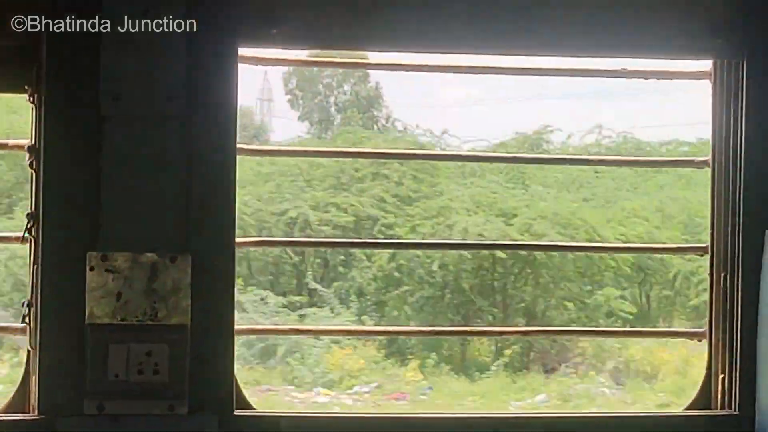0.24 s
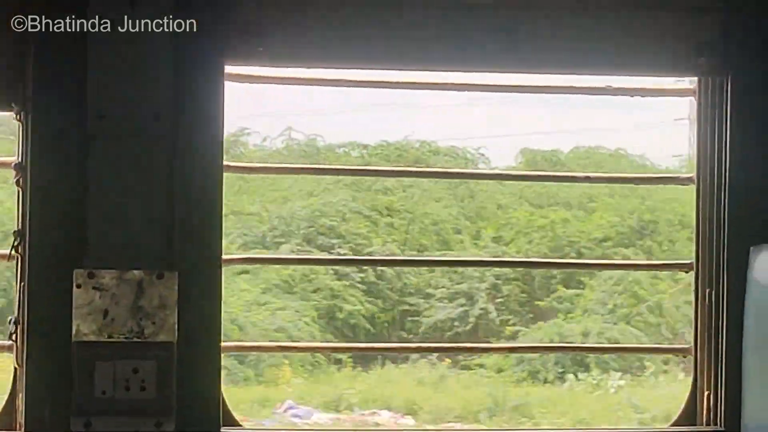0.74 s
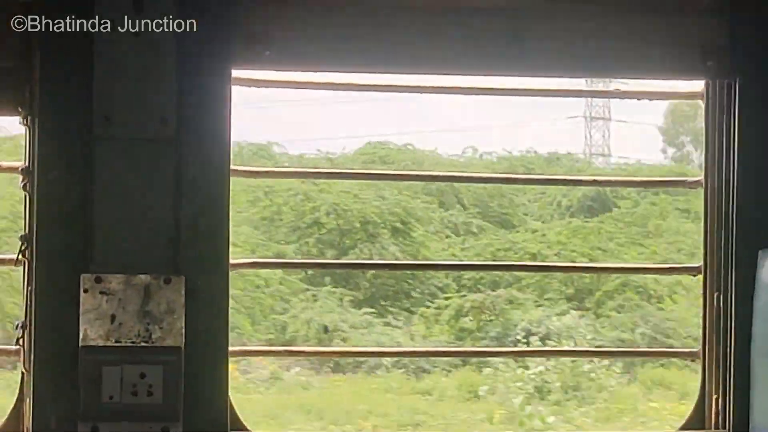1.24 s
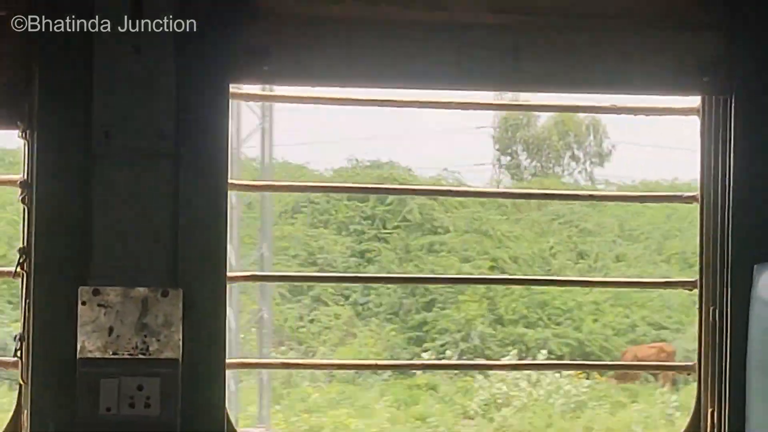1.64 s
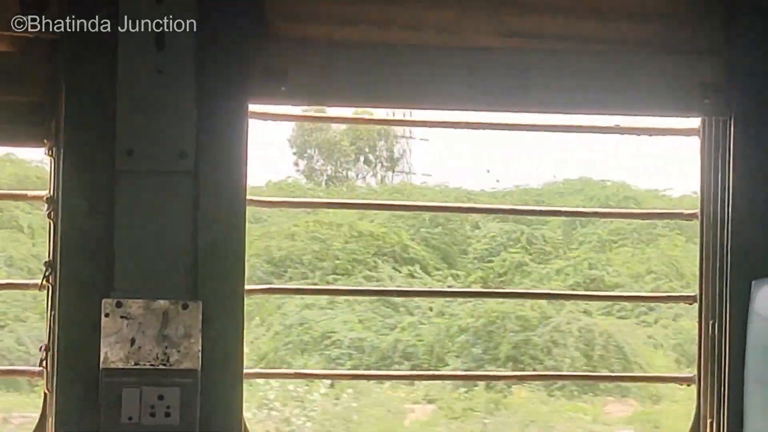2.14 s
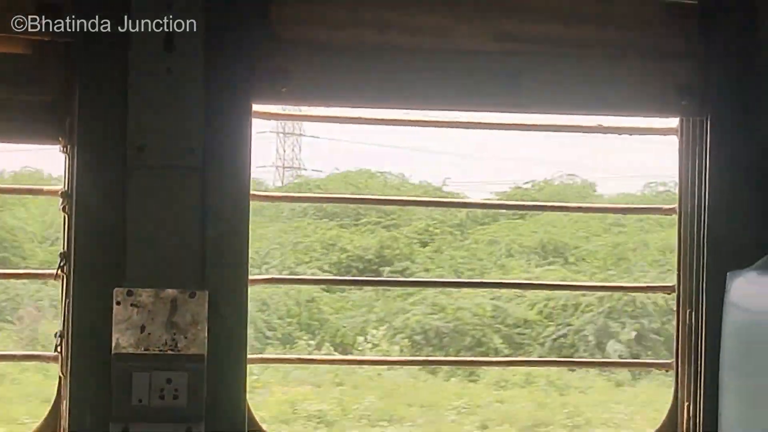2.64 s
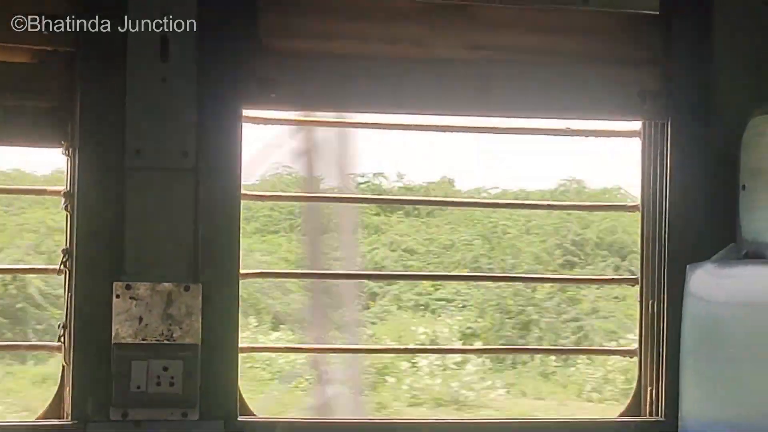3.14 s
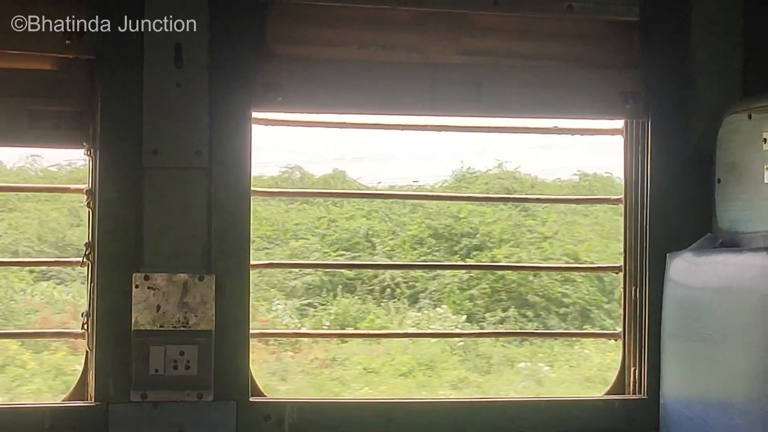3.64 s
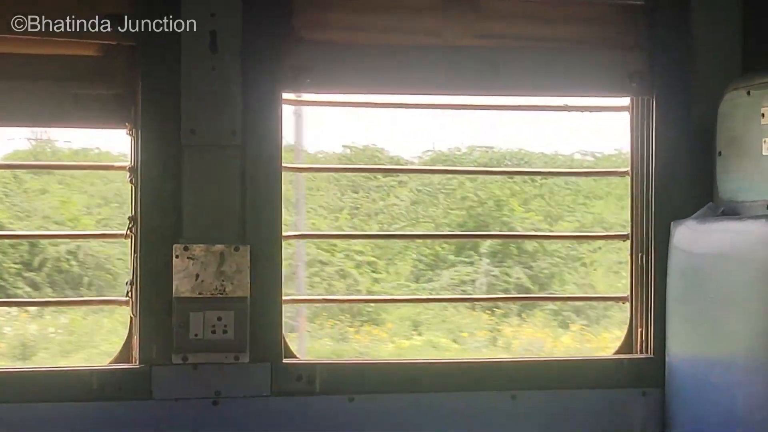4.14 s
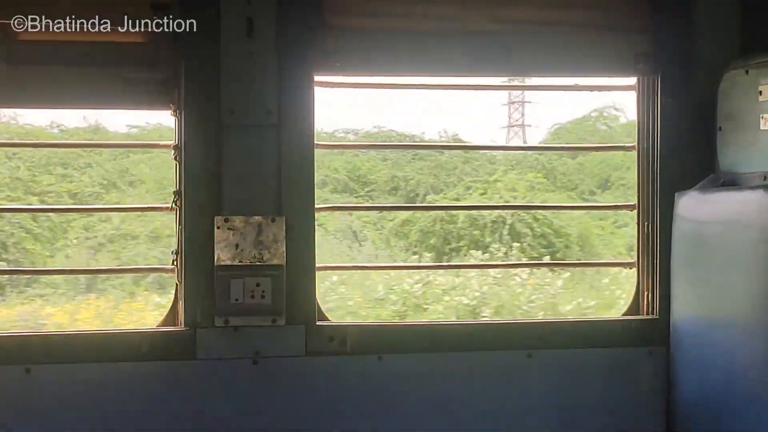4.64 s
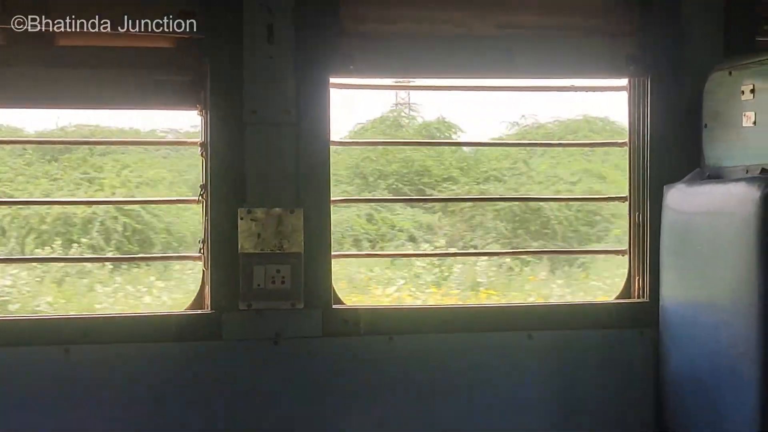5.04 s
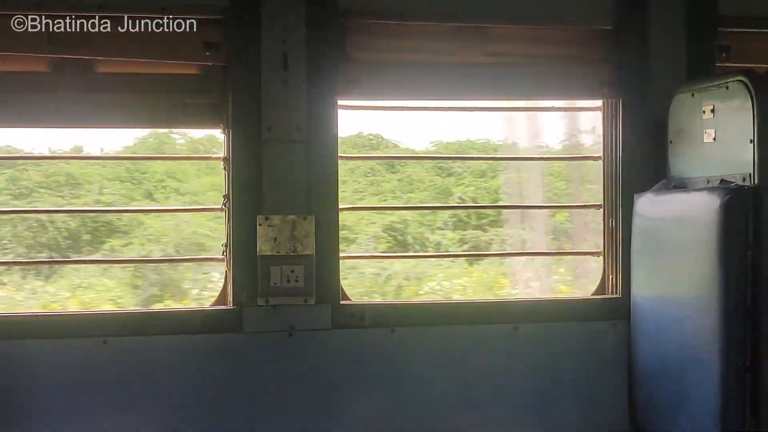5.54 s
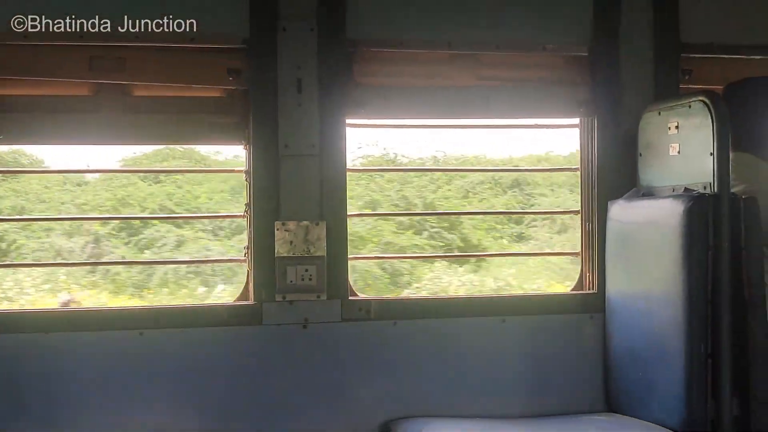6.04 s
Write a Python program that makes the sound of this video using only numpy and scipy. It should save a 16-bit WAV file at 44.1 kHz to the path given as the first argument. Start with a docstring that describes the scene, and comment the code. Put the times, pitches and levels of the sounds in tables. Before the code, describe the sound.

Inside a fast railway coach with open barred windows, wheels roar and rasp over joints while loose panels clatter and wind hisses mostly on the right.

```python
"""Inside a passenger coach running at speed with its windows open: the body booms in shaped low noise and drones in low tones.
Shaped noise gives the wheels' roar, rasp, chuff and rough ring; decaying sines give thuds, clanks and pings.
Random taps on decaying sines make loose parts rattle and clatter; bright noise hisses past the barred window, mostly on the right.
A limiter holds the peaks down, and now and then the level dips briefly."""
import sys
import numpy as np
from scipy import signal
from scipy.fft import rfft, irfft, next_fast_len
from scipy.io import wavfile
from scipy.ndimage import uniform_filter1d, minimum_filter1d

SR = 44100
rng = np.random.default_rng(int(sys.argv[2]) if len(sys.argv) > 2 else 0)


def to_wav(sig):
    """Store sig (one row per channel, or 1-D mono) as 16-bit WAV at the path in sys.argv[1].

    Samples outside -1..1 are clipped; the rate is SR.
    """
    pcm = np.clip(np.atleast_2d(sig), -1, 1) * 32767
    pcm = np.round(pcm).astype(np.int16)
    wavfile.write(sys.argv[1], SR, pcm.T)  # frames by channels


N = 277389  # length in samples

# Wheels rolling on the rail, before each layer's own offset: time_s, level_db
ROAR = [(0, -31), (0.14, -30.5), (0.22, -26), (0.6, -28.5), (0.9, -28), (1.15, -29.5), (1.75, -26),
        (2.25, -28.5), (2.45, -28.5), (3.5, -28.5), (3.7, -26), (4.45, -29.5), (4.8, -26.5), (5.8, -25.5),
        (6.0, -27.5), (6.29, -27.5)]
# Tone colour of the roar: frequency_hz, level_db (per hertz)
ROAR_COLOUR = [(150, -43), (300, -1), (400, -1.5), (580, 1), (690, -1.5), (830, 0), (1050, 0), (1400, -6),
               (1800, -8.5), (2300, -14), (2900, -17), (4500, -23.5), (8000, -55), (10000, -70)]
# Resonances of wheels and rail: pitch_hz, width_hz, height_db
WHEEL_MODES = [(470.5, 3.7, 4.5), (489.5, 16, 5), (782.6, 120, 0.5), (878, 16, 2.5), (1084, 22, 0)]
# Balance of the wheels and coach body: frequency_hz, left_minus_right_db
WHEEL_SIDE = [(30, -1.5), (200, -0.5), (380, -1.5), (520, .5), (1300, 0.5), (1800, 3.5), (2300, 2.5),
              (3000, 0)]
# Axles drop at joints or dents, often in pairs, before offset and scatter:
# time_s, level_db, hardness (dB per octave)
THUDS = [(0.018, -6, -7), (0.043, -13.5, 0.5), (.19, -18.5, 4), (0.648, -11, 0.5), (0.69, -22, -1),
         (0.874, -13.5, 0.5), (0.995, -18, 6.5), (1.247, -12, -5), (1.354, -7.5, 2), (1.682, -13.5, -6),
         (1.79, -10.5, 3.5), (2.16, -11, 1), (2.249, -16, 1), (2.291, -10.5, -4), (2.405, -14.5, 1),
         (2.603, -9, 1.5), (2.691, -16, 0), (2.72, -14.5, 6), (3.093, -14, -5), (3.19, -17.5, -16),
         (3.223, -8, -4.5), (3.27, -15.5, -6), (3.352, -10, -0.5), (3.566, -9.5, -7), (3.675, -10, 3),
         (4.033, -6, -8.5), (4.066, -14, 2), (4.145, -5.5, -2.5), (4.955, -12, 1), (5.064, -13, -2.5),
         (5.479, -14.5, -1), (6.147, -12, -10)]
LEFT_RIGHT = np.array([[1], [-1]])


def from_db(db):
    """Turn decibels into gain."""
    return 10 ** (np.asarray(db) / 20)


def rms_one(x):
    """Scale to unit power."""
    return x / np.sqrt(np.mean(x ** 2) + 1e-20)


def in_time(rows):
    """Join the points of each column with straight lines, sample by sample."""
    times, *columns = np.transpose(rows)
    return [np.interp(np.arange(N) / SR, times, column) for column in columns]


def at_hz(points, hz):
    """Read a spectrum on a log-frequency axis."""
    point_hz, point_db = np.array(points)[:, 0], np.array(points)[:, 1]
    return np.interp(np.log(hz + 1e-9), np.log(point_hz), point_db)


def swell(at, rise_s, fall_s):
    """A straight rise to 1 at the given time, and a straight fall back to 0."""
    return np.interp(np.arange(N) / SR, [at - rise_s, at, at + fall_s], [0, 1, 0])


def drift(rate):
    """Slow random wander with spread 1: noise smoothed by two equal poles at the given rate in Hz."""
    step = 40  # one slow value per 40 samples
    warm_up = 2000
    r = np.exp(-2 * np.pi * rate * step / SR)
    noise = rng.standard_normal(N // step + warm_up + 2)
    slow = signal.lfilter([1], [1, -2 * r, r * r], noise)[warm_up:]
    return np.interp(np.arange(N) / step, np.arange(len(slow)), rms_one(slow))


def ring(clicks, hz, t60):
    """A unit click starts a sine of height 1 that loses 60 dB in t60 seconds."""
    r = np.exp(-np.log(1000) / (t60 * SR))
    w = 2 * np.pi * hz / SR
    return signal.lfilter([0, np.sin(w)], [1, -2 * r * np.cos(w), r * r], clicks + 1e-18)


def cabin_noise(colour, balance, modes=()):
    """Random forcing, coloured and lifted at its resonances, heard in two channels; rms 1."""
    # How alike left and right are: frequency_hz, correlation
    likeness = [(60, 0.98), (160, 0.98), (260, 0.8), (390, 0.53), (480, 0.77), (640, 0.34), (860, 0.56),
                (1000, 0.11), (1600, -0.3), (2100, -0.1), (2600, 0.21), (3500, -0.2), (4800, 0.1),
                (8000, -0.0091)]
    size = next_fast_len(N)
    hz = np.arange(size // 2 + 1) * SR / size
    peaks_db = sum(db / (1 + (2 * (hz - f) / width) ** 2) for f, width, db in modes)
    level_db = at_hz(colour, hz) + peaks_db
    alike = np.clip(at_hz(likeness, hz), -1, 1)
    mid, side = rfft(rng.standard_normal((2, size)))
    pair = np.sqrt(1 + alike) * mid + np.sqrt(1 - alike) * side * LEFT_RIGHT
    side_db = LEFT_RIGHT * at_hz(balance, hz) / 2
    return rms_one(irfft(pair * from_db(level_db + side_db), size)[:, :N])


def steady(x, seconds):
    """Even out swells slower than the given time."""
    power = uniform_filter1d(np.mean(x ** 2, axis=0), max(int(seconds * SR), 2))
    return x / np.sqrt(power + 1e-9)


def dips():
    """Gain of the whole sound, which falls quickly at each dip and recovers more slowly."""
    # Brief dips: time_s, depth_db
    dip_rows = [(0.029, 3), (0.535, 5.5), (1.83, 2), (2.73, 1.5), (3.25, 1), (3.825, 3)]
    return from_db(-sum(db * swell(s, rise_s=0.012, fall_s=0.12) for s, db in dip_rows))


def lulls():
    """Gain of the bass, which mostly drops away for a moment between surges."""
    # Lulls (a negative depth is a rise): time_s, depth_db
    lull_rows = [(.24, 5), (.45, 1), (.67, 3), (.99, 11), (1.15, 6), (1.58, 6), (2.07, 4), (3.28, -2),
                 (3.5, 8), (4.18, 7), (4.6, 3), (5.66, 5)]
    return from_db(-sum(db * swell(s, rise_s=0.04, fall_s=0.04) for s, db in lull_rows))


def window(level_db=1.0, fine_db=0.96, whistle_db=-18, waver_db=4, flutter_db=1.0, split_hz=6000):
    """Turbulent air along the window bars flutters, larger and finer eddies apart; a thin whistle flares."""
    # Air rushing past, before offsets: time_s, level_db
    air_rows = [(0, -36.5), (0.12, -39), (0.33, -35), (0.58, -39), (0.84, -36), (0.95, -39.5),
                (1.08, -37.5), (1.24, -36), (1.68, -35), (1.78, -32.5), (1.9, -35.5), (2.15, -35.5),
                (2.32, -37.5), (2.46, -36), (2.74, -39.5), (2.84, -36.5), (3.02, -35.5), (3.35, -38.5),
                (3.6, -36), (3.76, -36), (4.12, -38), (4.31, -36.5), (4.55, -38.5), (4.95, -34), (5.2, -35),
                (5.7, -35), (5.8, -32.5), (6.0, -37), (6.29, -35)]
    # Tone colour of the hiss: frequency_hz, level_db (per hertz)
    hiss_colour = [(1200, -7), (2300, -3.5), (3000, -3), (3700, 2.5), (4500, 0.5), (6400, 0.5), (7300, 3),
                   (8000, -5), (8800, -19), (9600, -24.5), (11500, -20.5), (13000, -17.5), (13700, -22),
                   (14300, -29)]
    # Whistle of the air on the bars: frequency_hz, level_db (per hertz)
    whistle_colour = [(6000, -48), (6900, 7), (7100, -31), (7280, 16), (7500, -23), (8400, -50),
                      (12500, -45), (12950, -17), (13400, -45)]
    # Balance of the window: frequency_hz, left_minus_right_db
    window_side = [(2500, -14.5), (3700, -5.5), (5000, -9.5), (6600, -10), (7400, -6), (8300, 2.5),
                   (9600, -23), (10800, -11), (12200, -3.5), (14000, -2)]
    # The whistle flares: time_s, rise_db
    whistle_rows = [(1.215, 12), (1.44, 13), (3.46, 13)]
    # Gusts brighten the hiss: time_s, rise_db, length_s
    gust_rows = [(1.35, 0.5, .4), (1.98, 2, .1), (2.124, 2, 0.1), (5.79, 1, 0.14)]

    hiss_db, = in_time(air_rows)
    flare_db = sum(db * swell(s, rise_s=0.053, fall_s=0.13) for s, db in whistle_rows)
    gust_db = sum(db * swell(s, length / 2, length / 2) for s, db, length in gust_rows)

    air = cabin_noise(hiss_colour, window_side)
    larger = signal.sosfiltfilt(signal.butter(4, split_hz, fs=SR, output="sos"), air)
    finer = air - larger
    larger_gain = from_db(hiss_db + level_db + flutter_db * drift(rate=18))
    finer_gain = from_db(hiss_db + fine_db + gust_db + flutter_db * drift(rate=18))

    waver = waver_db * np.tanh(drift(rate=36))
    whistle_gain = from_db(hiss_db + whistle_db + flare_db + waver)
    whistle = whistle_gain * cabin_noise(whistle_colour, window_side)
    return larger_gain * larger + finer_gain * finer + whistle


def loose_parts(taps_per_s, t60, range_hz, count=10):
    """Random taps set loose parts ringing, each with its own pitch and place; rms 1."""
    out = np.zeros((2, N))
    for hz in np.geomspace(*range_hz, count):
        hits = rng.random(N) < taps_per_s / count / SR
        taps = hits * rng.uniform(.4, 1, N) * rng.choice([-1, 1], N)
        # higher rings spread further between the channels
        angle = np.pi / 4 + rng.uniform(-1.7, 1) * hz / 900
        place = np.array([[np.cos(angle)], [np.sin(angle)]])
        out += place * ring(taps, hz, t60)
    return rms_one(out)


def rattle(per_s=50, level_db=-39, t60=0.089, range_hz=(300, 1200)):
    """Loose shutters and fittings chatter at random, louder when the wheels roar louder."""
    roar_db, = in_time(ROAR)
    gain = from_db(level_db + roar_db - roar_db.mean())
    return gain * loose_parts(per_s, t60, range_hz, count=20)


def clatter(per_s=600, level_db=2, t60=0.055, rise_s=0.0071, fall_s=0.028, ring_on_s=0.063):
    """A jolt shakes heavy panels and light parts at once: a quick flurry of taps that rings on briefly."""
    # Clatters, before the offset: time_s, panels_db, light_parts_db
    clatter_rows = [(0.186, -48, -31.5), (0.236, -41, -37), (.885, -30, -30), (1.284, -30, -36),
                    (1.89, -44, -31), (2.133, -30, -39), (2.199, -29, -32), (2.277, -31, -40),
                    (2.783, -30, -37), (3.661, -32, -41), (3.769, -45, -32), (3.87, -37, -32),
                    (5.289, -32, -43), (5.351, -39, -40), (5.508, -33, -32), (5.771, -38, -28),
                    (5.846, -36, -30)]
    panels_hz, light_parts_hz = (402, 634), (740, 1109)
    times, *group_dbs = np.transpose(clatter_rows)
    flurry = sum(swell(s, rise_s, fall_s) for s in times)
    out = 0
    for dbs, range_hz in zip(group_dbs, (panels_hz, light_parts_hz)):
        strength = sum(from_db(db) * swell(s, rise_s, ring_on_s) for s, db in zip(times, dbs))
        taps = loose_parts(per_s * flurry, t60, range_hz)
        out = out + strength * steady(taps, seconds=0.017)
    return from_db(level_db) * out


def pings(per_s=6, level_db=-40, t60=0.2):
    """Pits in the rail tap the wheels, whose modes ring out in short metallic fragments."""
    out = 0
    for hz, _, db in WHEEL_MODES:
        taps = (rng.random(N) < per_s / SR) * rng.uniform(.3, 1, (2, N))
        out = out + from_db(db) * ring(taps, hz, t60)
    return from_db(level_db) * rms_one(out)


def wheel_flat(level_db=-40.0, turns_per_s=10.08, first_s=0.0063, rise_s=0.023, fall_s=0.037,
               scatter_db=2, band_hz=(660, 980)):
    """A worn patch on one wheel chuffs once every turn: a band of noise swells and fades."""
    times = first_s + np.arange(N / SR * turns_per_s) / turns_per_s
    beats = sum(from_db(scatter_db * rng.normal()) * swell(s, rise_s, fall_s) for s in times)
    noise = cabin_noise(ROAR_COLOUR, WHEEL_SIDE, WHEEL_MODES)
    scuff = signal.sosfilt(signal.butter(2, band_hz, "band", fs=SR, output="sos"), noise)
    return from_db(level_db) * rms_one(beats * scuff)


def flanges(base_db=-38.5, roar_share=0.22, flutter_db=1.5, hoarse_share=0.76, sing_db=-45.5, width_hz=52):
    """The wheels rasp along with the roar; flanges leaning on the rail add rasp and, more so, a rough ring."""
    # Tone colour of the rasp: frequency_hz, level_db (per hertz)
    flange_colour = [(900, -21), (1450, -35), (1700, -9), (1900, -5), (2090, -4), (2350, -7), (2700, -10),
                     (3300, -25), (6000, -60)]
    # Wheel resonances in this band: pitch_hz, width_hz, height_db
    flange_modes = [(2080, 90, 3), (2270, 50, 3)]
    # Flanges lean on the rail, before each layer's share: time_s, rise_db, length_s, pitch_hz
    rub_rows = [(0.216, 2.5, .1, 2060), (1.324, 3, 0.15, 2051), (1.716, 8, 0.099, 2094),
                (1.805, 7.5, .09, 2085), (2.079, 2.5, .14, 2055), (2.509, 6.5, .13, 2122),
                (2.882, 4, .1, 2040), (3.029, 2, .16, 2164), (3.61, 4, 0.084, 2142),
                (3.688, 6, 0.096, 2056), (3.93, 5, .1, 2060), (4.613, 4.5, 0.078, 2104),
                (5.56, 5.5, 0.25, 2110), (5.816, 7, 0.2, 2153), (5.947, 3, .08, 2043),
                (6.204, 5, .11, 2053)]

    roar_db, = in_time(ROAR)
    rub_db = sum(db * swell(s, length / 2, length / 2) for s, db, length, _ in rub_rows)
    level_db = base_db + roar_share * (roar_db - roar_db.mean()) + hoarse_share * rub_db
    noise = cabin_noise(flange_colour, WHEEL_SIDE, flange_modes)
    rasp = from_db(level_db + flutter_db * drift(rate=19)) * noise

    # the ring is slow noise carried up to a pitch that glides from rub to rub
    hz, = in_time([(s, pitch) for s, _, _, pitch in rub_rows])
    turn = np.exp(2j * np.pi * np.cumsum(hz) / SR)
    sing = np.array([np.real((drift(width_hz) + 1j * drift(width_hz)) * turn) for _ in range(2)])
    sides = from_db(LEFT_RIGHT * at_hz(WHEEL_SIDE, hz.mean()) / 2)
    return rasp + from_db(sing_db + 1.56 * rub_db) * sides * steady(sing, seconds=0.066)


def knocks(t60=0.19, contact_s=0.0053):
    """Hard hits set a wheel clanking at a single pitch; a fast-fading ring is taken away to soften the start."""
    # Clanks, before softening: time_s, level_db, pitch_hz
    knock_rows = [(.17, -26, 993), (.785, -20.5, 894), (.885, -26, 512), (2.125, -20, 479),
                  (2.27, -17, 487), (2.785, -22, 880), (3.095, -20.5, 464), (3.365, -27, 466),
                  (3.77, -24, 968), (3.865, -21, 878), (4.14, -17, 476), (4.635, -20, 475),
                  (4.955, -22, 872), (5.835, -22, 890)]
    out = 0
    for s, db, hz in knock_rows:
        blow = np.zeros(N)
        blow[int(s * SR)] = from_db(db)
        out = out + ring(blow, hz, t60) - ring(blow, hz, contact_s * np.log(1000))
    return out


def rolling(jolt_db=4.0, jolt_rise_s=0.012, jolt_fall_s=0.072):
    """Rough rail makes wheels roar and drums on the floor; both judder together, and the roar leaps at joints."""
    # Rail roughness felt through the floor, before offsets: time_s, level_db
    drum_rows = [(0, -32), (1.0, -31), (1.25, -34), (2.4, -32.5), (2.95, -32.5), (3.25, -31), (3.45, -39.5),
                 (3.6, -34.5), (4.85, -33.5), (5.15, -36.5), (6.29, -34.5)]
    # Tone colour of the drumming: frequency_hz, level_db (per hertz)
    drum_colour = [(70, -10.5), (115, -1.5), (150, -2.5), (180, -6), (208, -10.5), (260, -8), (320, -19),
                   (450, -18), (1200, -79)]

    drum_db, = in_time(drum_rows)
    roar_db, = in_time(ROAR)
    judder = drift(rate=10)
    rough_db = roar_db - roar_db.mean()
    leap_db = jolt_db * sum(from_db(db) * swell(s, jolt_rise_s, jolt_fall_s) for s, db, _ in THUDS)

    drum_gain = from_db(drum_db + 6.0 + 0.61 * rough_db + 1.25 * judder)
    drum = drum_gain * steady(cabin_noise(drum_colour, WHEEL_SIDE), seconds=0.071)
    roar_gain = from_db(roar_db - 1.5 + leap_db + 1.1 * judder)
    roar = roar_gain * steady(cabin_noise(ROAR_COLOUR, WHEEL_SIDE, WHEEL_MODES), seconds=0.087)
    return drum + roar


def drones(waver_hz=1.05, waver_db=3.5):
    """The ride catches low body resonances: nearly pure tones build up and die away, wavering."""
    # Drones, before wavering: middle_s, pitch_hz, level_db (rms at the peak), length_s
    drone_rows = [(0.83, 55.04, -20.5, 0.44), (1.65, 56.45, -23.5, 0.38), (1.834, 68.4, -12.5, 0.059),
                  (1.92, 48.7, -25.5, 1), (2.494, 52.6, -23.5, 0.43), (3.43, 52, -27, 0.1),
                  (3.98, 57, -25, 0.18), (4.99, 48.5, -22.5, 0.59), (5.289, 57, -22.5, 0.3),
                  (6.025, 56.85, -21.5, 0.37)]
    wander = waver_hz * drift(rate=2.9)
    out = 0
    for (s, hz, db, length), turn in zip(drone_rows, rng.random(len(drone_rows))):
        phase = 2 * np.pi * (turn + np.cumsum(hz + wander) / SR)
        strength = from_db(db) * np.sin(np.pi / 2 * swell(s, length / 2, length / 2))
        out = out + strength * np.sqrt(2) * np.sin(phase)
    return out * from_db(waver_db * drift(rate=8.6))


def body(level_db=2.23, surge_db=0.4):
    """The coach sways and booms in its lowest modes, in uneven surges, with brief rises and sinks."""
    # Body rumble, before offsets: time_s, level_db
    rumble_rows = [(0, -24.5), (0.35, -21.5), (0.58, -23), (0.82, -23.5), (1.0, -18.5), (1.2, -21),
                   (1.55, -23.5), (1.8, -23.5), (1.95, -28), (2.15, -21.5), (2.55, -20.5), (2.8, -22.5),
                   (3.2, -23), (3.75, -21.5), (4.15, -24.5), (4.35, -22.5), (4.65, -22), (4.95, -22.5),
                   (5.3, -20), (5.55, -21.5), (6.29, -20.5)]
    # Tone colour of the rumble: frequency_hz, level_db (per hertz)
    rumble_colour = [(5, -2), (14, -2), (30, 1), (40, -8), (65, -4.5), (100, -9.5), (130, -21), (250, -38),
                     (600, -74)]
    # Resonances of the coach body: pitch_hz, width_hz, height_db
    body_modes = [(29, 6.8, 1.5), (48.6, 1.8, 12.5), (56.3, 4.3, 10), (70.9, 15, 7.5), (90.5, 4.9, 5),
                  (104.2, 5.7, 9.5)]
    # Brief changes of the rumble's level (a negative rise is a sink): time_s, rise_db
    change_rows = [(.09, 5.5), (.315, 3.5), (.38, 2), (1.825, 4), (2.01, 5), (2.14, -1), (2.28, 2),
                   (2.57, -1), (3.385, 0.5), (3.58, 2), (3.99, 9), (4.351, 4), (5.91, 0)]

    rumble_db, = in_time(rumble_rows)
    change_db = sum(db * swell(s, rise_s=0.021, fall_s=0.053) for s, db in change_rows)
    boom = steady(cabin_noise(rumble_colour, WHEEL_SIDE, body_modes), seconds=0.0787)
    return from_db(rumble_db + level_db + change_db + surge_db * drift(rate=23.0)) * boom


def joints(level_db=-3.5, contact_s=0.03, scatter_db=1.53, grind_db=-37, spring_hz=330, pivot_hz=170):
    """Each axle drops with a blow and a short grind that ring the floor through springs; hard blows are brighter."""
    # Ringing of bogie and floor, before the springs soften it: pitch_hz, level_db, t60_s
    floor_modes = [(105, -10.5, 0.12), (150.4, -1.5, 0.16), (179.1, -3, 0.18), (207, -6, 0.12),
                   (262.8, -4.5, 0.12), (371, -13.5, 0.14), (473.2, -14, 0.29), (604, -18, 0.25)]
    s, peak_db, hardness = np.transpose(THUDS)
    at = np.clip((s * SR).astype(int), 0, N - 1)
    out = np.zeros((2, N))
    for k, (hz, mode_db, t60) in enumerate(floor_modes):
        tilt_db = hardness * np.log2(hz / pivot_hz)
        blows = np.zeros(N)
        blows[at] = from_db(peak_db + mode_db + tilt_db + rng.normal(0, scatter_db, len(at)))
        contact = signal.lfilter([1], [1, -np.exp(-1 / (contact_s * SR))], blows + 1e-18)
        grind = from_db(grind_db) * contact * rng.standard_normal(N)
        # neighbouring modes push in opposite directions
        out += (-1) ** k * ring(blows + grind, hz, t60)
    springs = signal.butter(1, spring_hz, fs=SR, output="sos")
    return from_db(level_db) * signal.sosfilt(springs, out)


def scene():
    """Everything heard from the seat."""
    bass = lulls() * (body() + drones())
    wheels = rolling() + wheel_flat() + pings() + knocks() + flanges() + joints()
    return dips() * (bass + wheels + rattle() + clatter() + window())


def record(dry):
    """A look-ahead limiter ducks everything under the peaks; then the top of the treble is cut."""
    ceiling, release_db_per_s, cutoff_hz = 0.42, 117, 14200
    over_db = 20 * np.log10(np.maximum(np.abs(dry).max(axis=0) / ceiling, 1))
    recovery_db = release_db_per_s * np.arange(N) / SR
    duck_db = recovery_db - np.maximum.accumulate(over_db + recovery_db)
    # start each duck ahead of its peak, then smooth it
    early_db = minimum_filter1d(duck_db, size=129)
    gain = from_db(uniform_filter1d(early_db, size=129))
    top_cut = signal.ellip(12, .1, 80, cutoff_hz, fs=SR, output="sos")
    return signal.sosfilt(top_cut, dry * gain)


dry = scene()
out = record(dry)
to_wav(out)
```